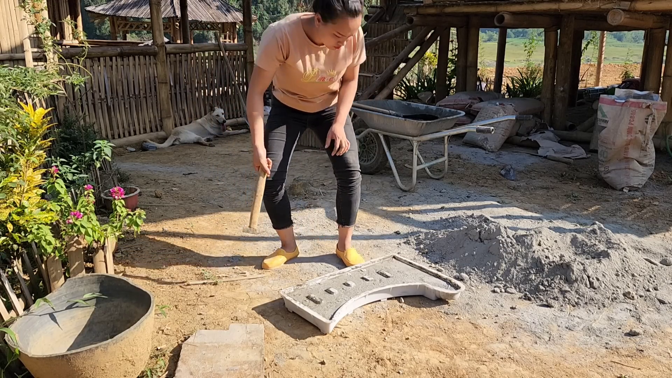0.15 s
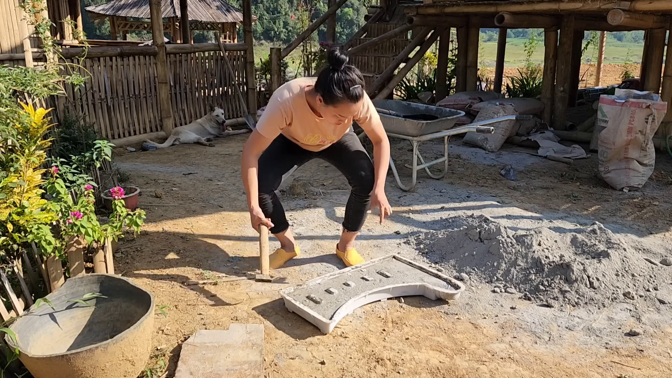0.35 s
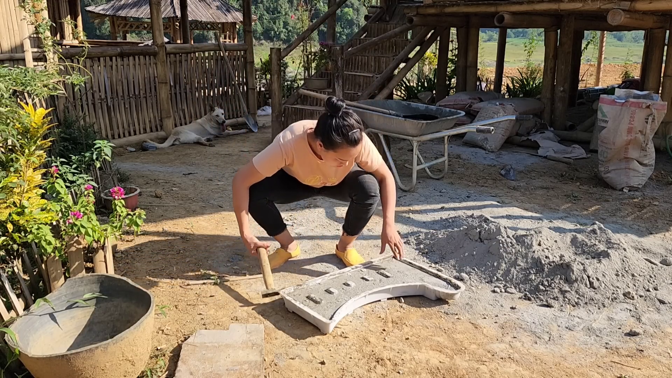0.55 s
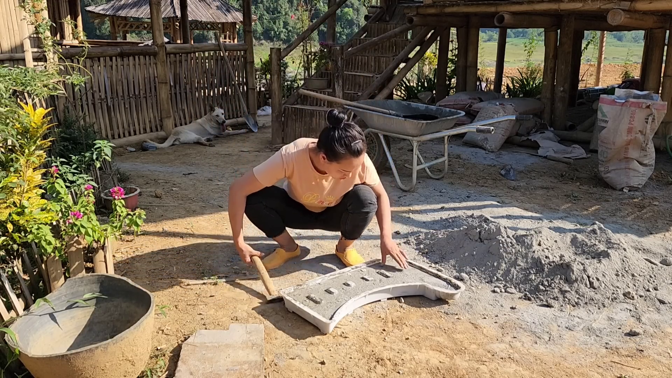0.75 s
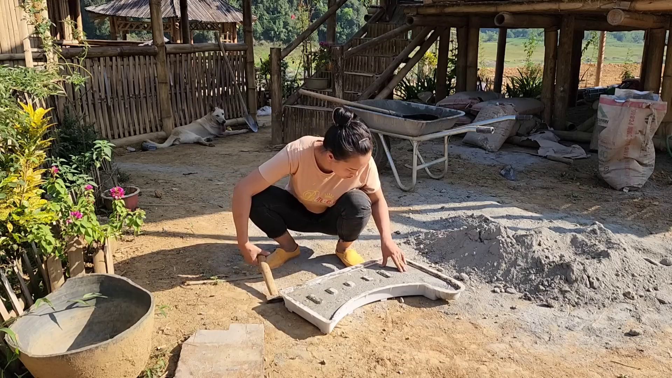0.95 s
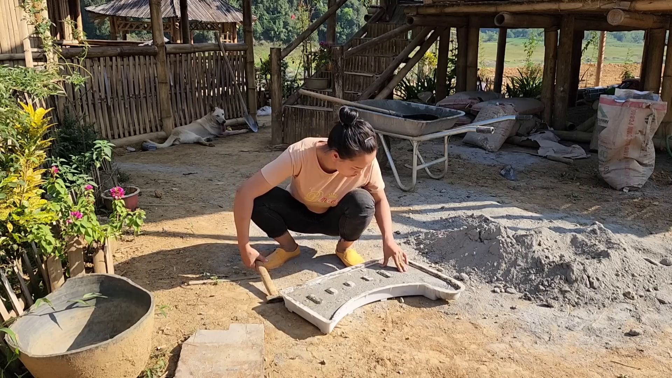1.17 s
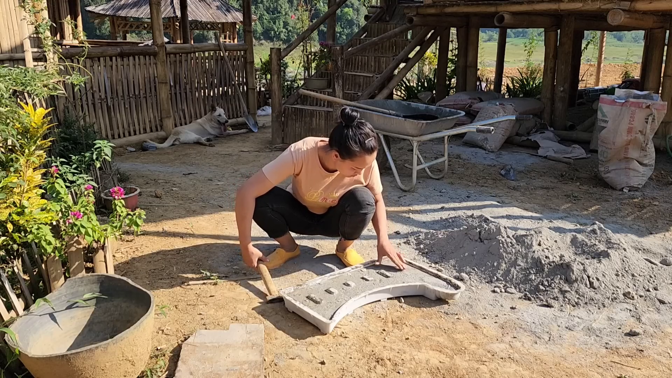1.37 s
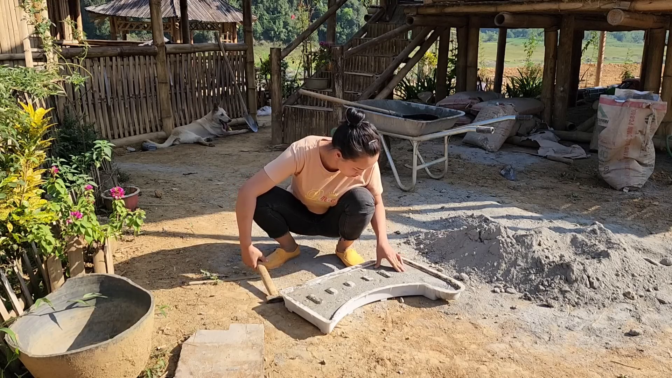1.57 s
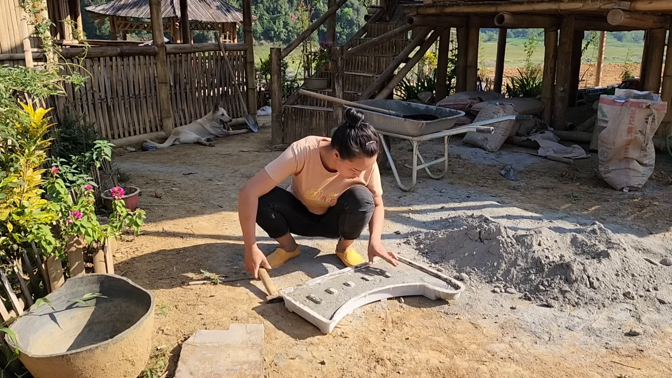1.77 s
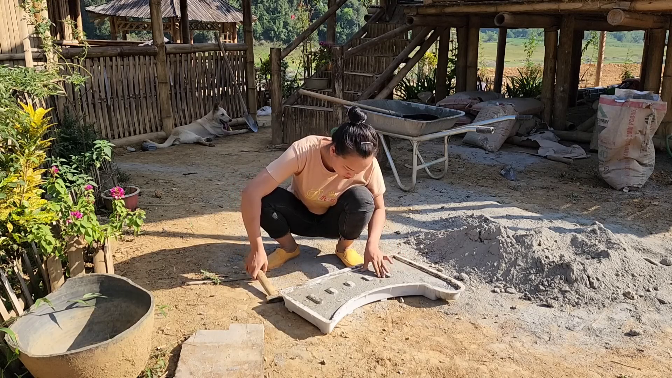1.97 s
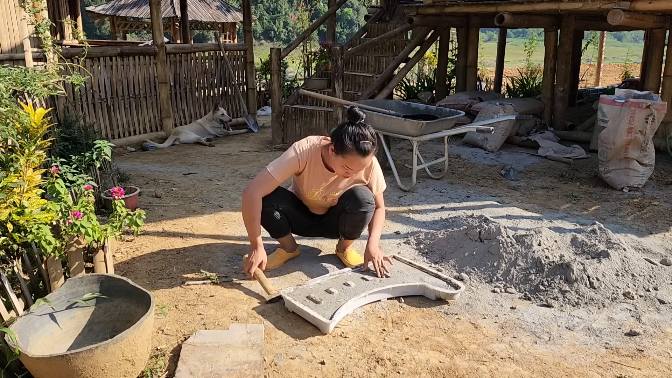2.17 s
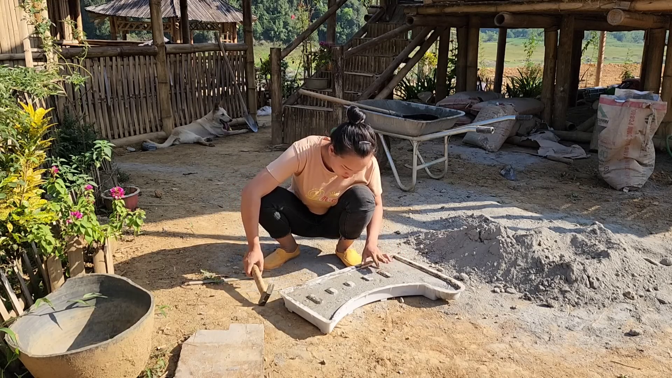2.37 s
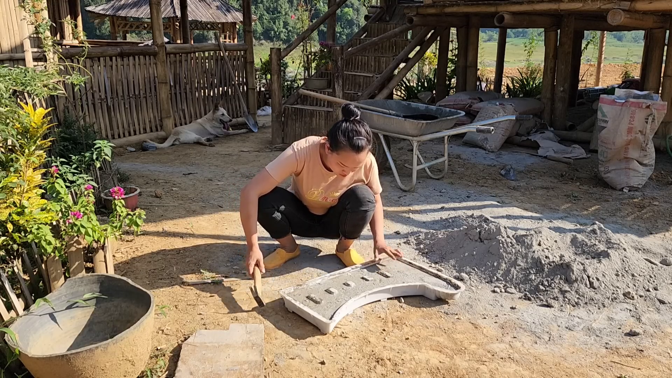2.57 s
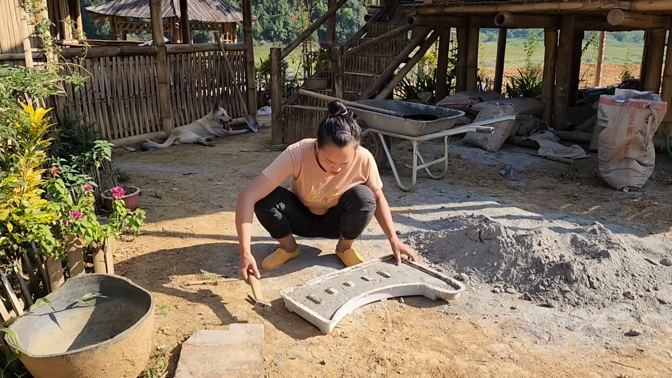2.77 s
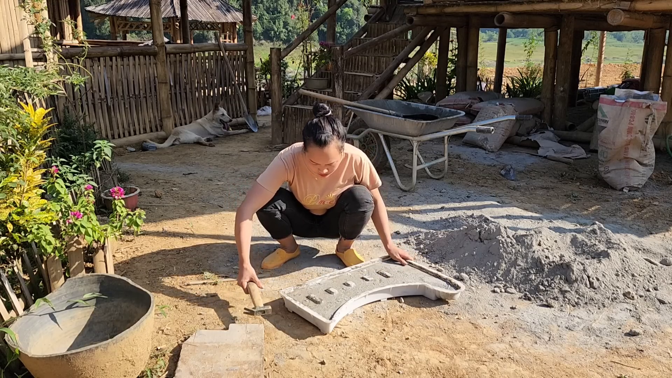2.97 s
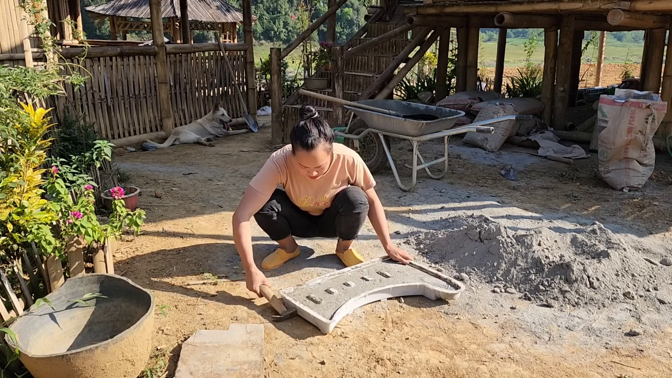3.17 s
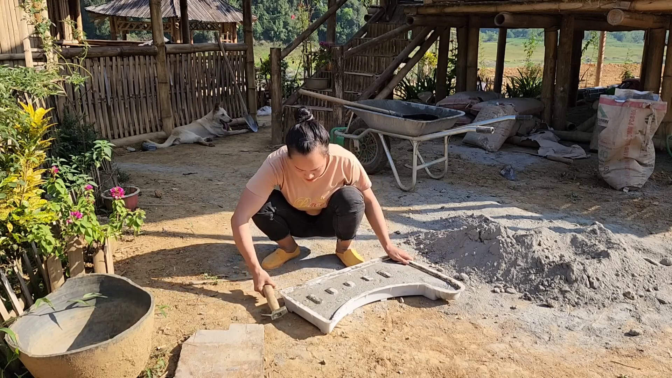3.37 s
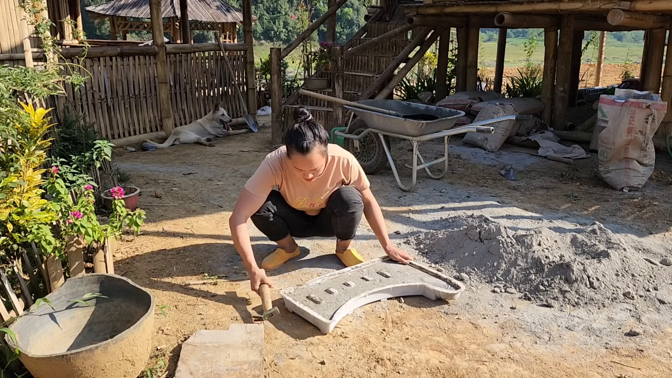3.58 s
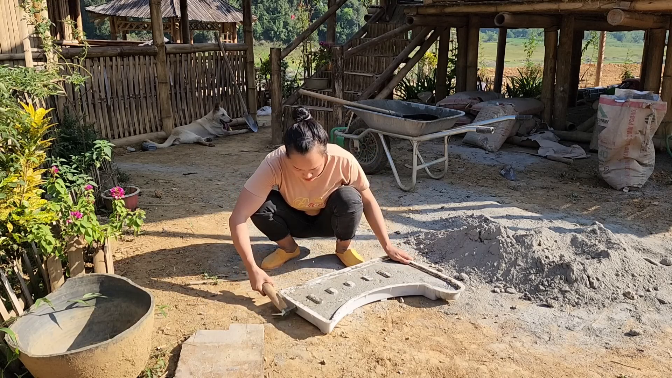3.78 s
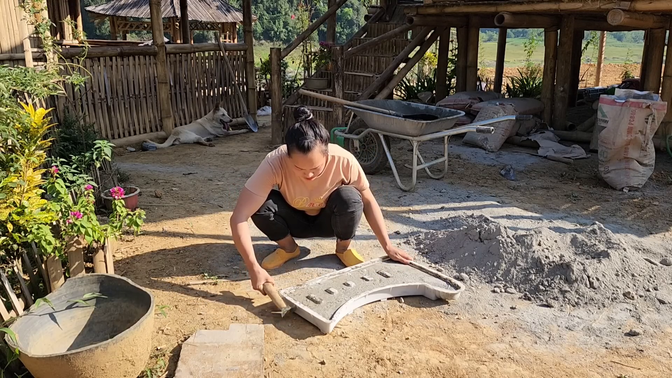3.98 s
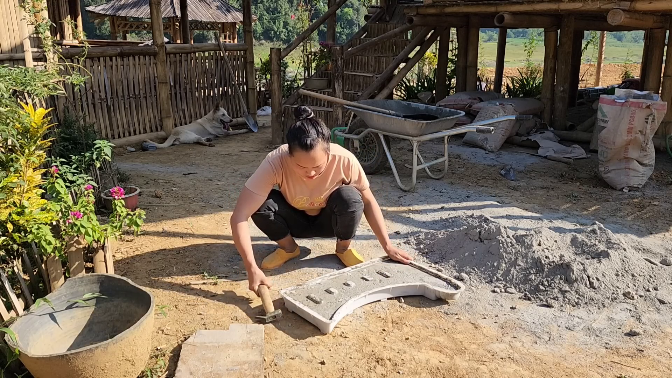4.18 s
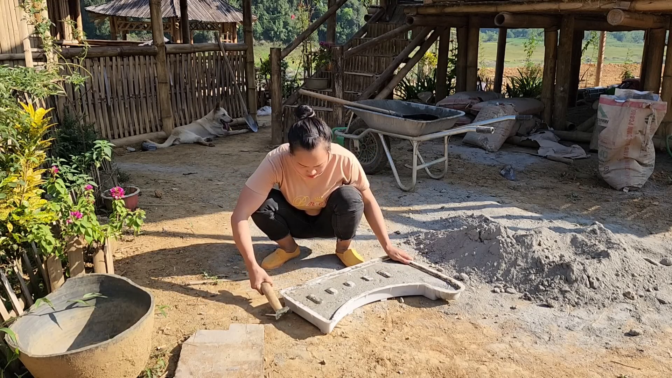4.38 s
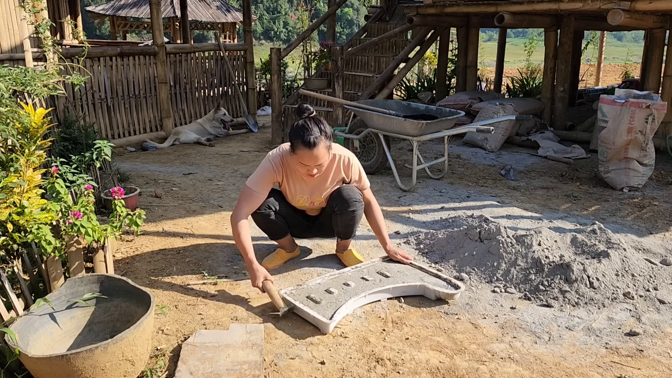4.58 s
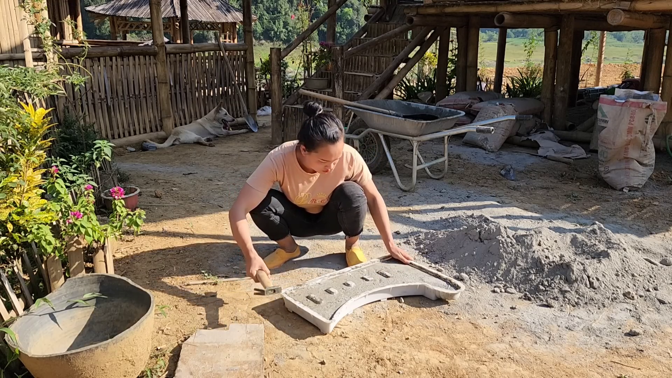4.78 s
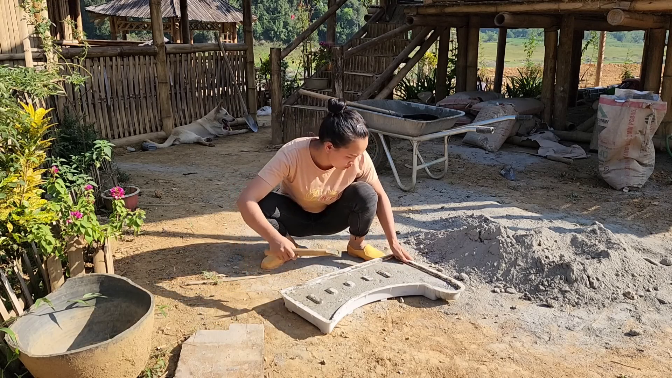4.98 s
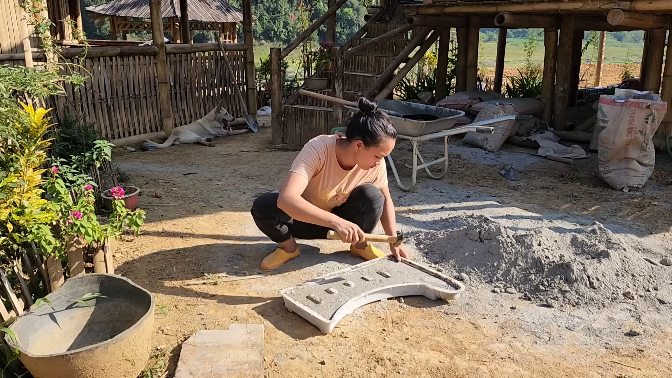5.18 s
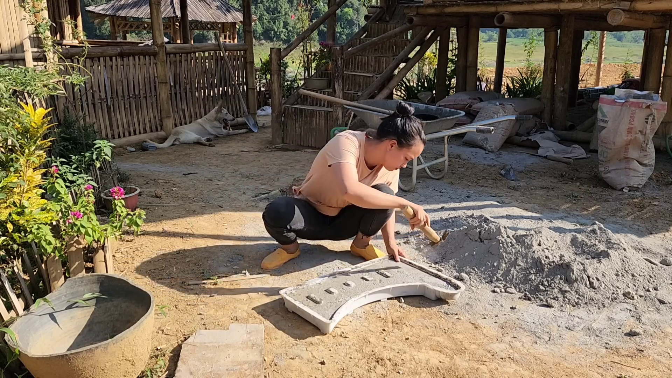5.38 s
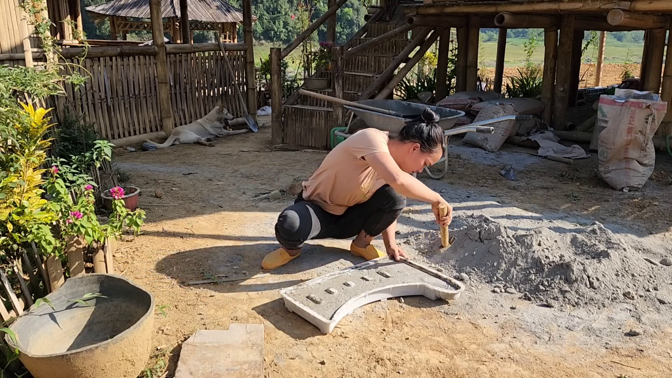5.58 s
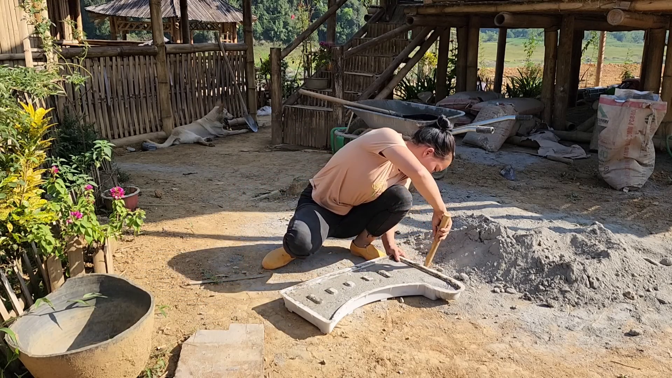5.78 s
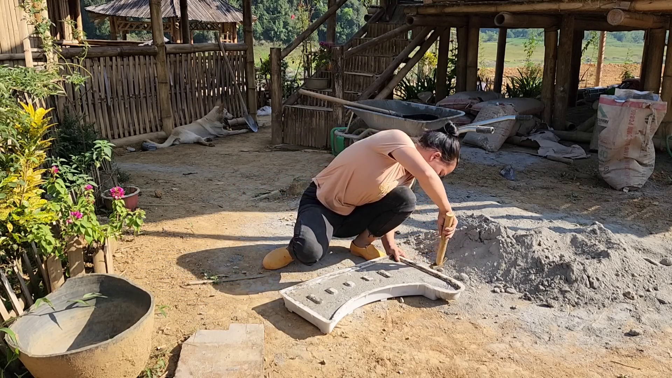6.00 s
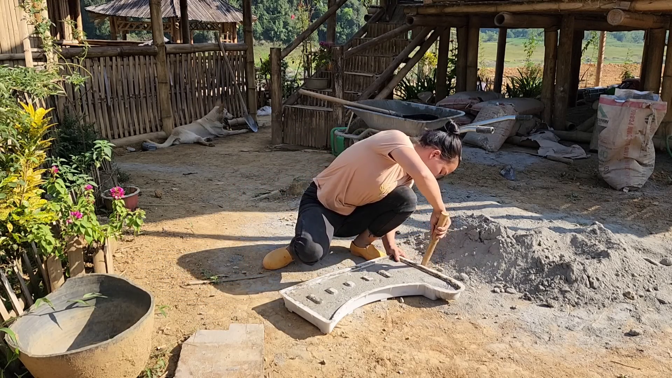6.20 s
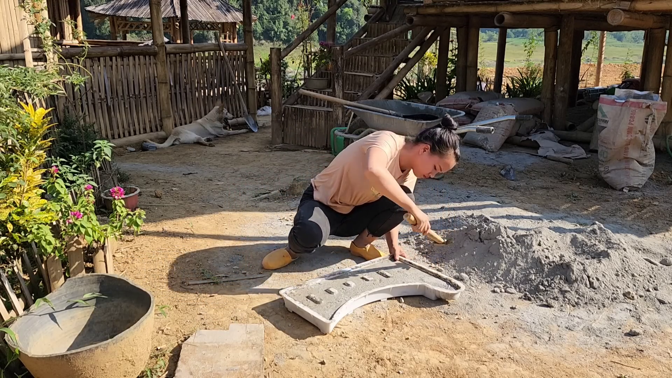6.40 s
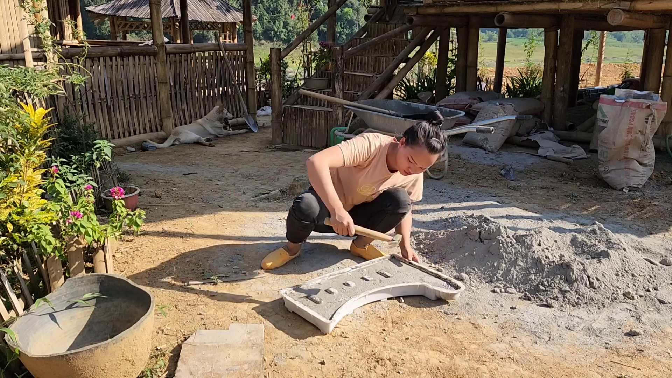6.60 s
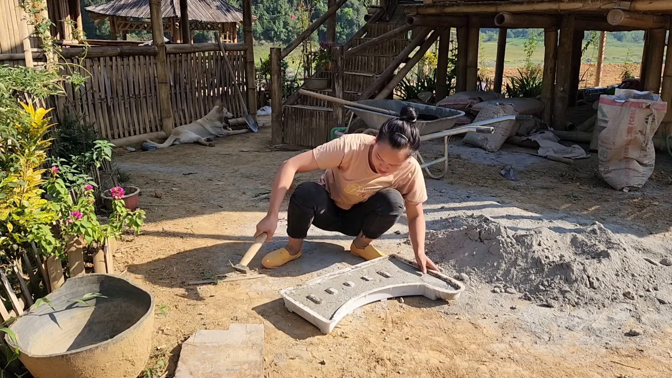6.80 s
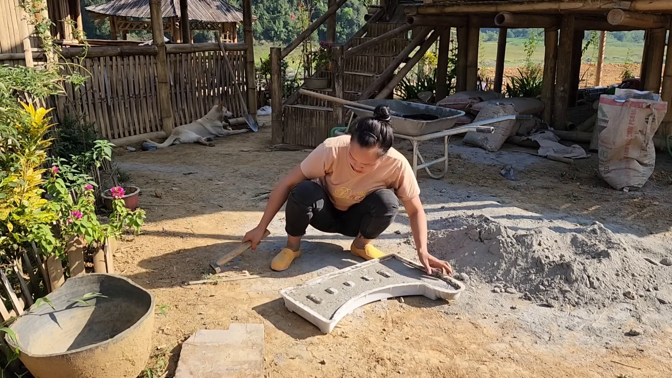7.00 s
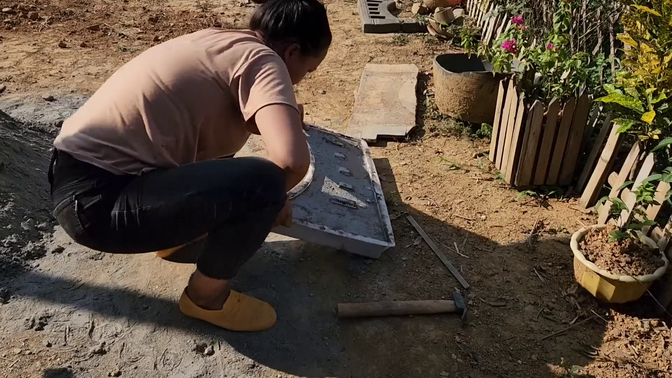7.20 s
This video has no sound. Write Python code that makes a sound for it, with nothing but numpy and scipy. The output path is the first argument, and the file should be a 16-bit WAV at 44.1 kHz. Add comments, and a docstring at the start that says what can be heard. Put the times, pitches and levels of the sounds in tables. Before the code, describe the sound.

Sharp, close mallet blows on a concrete casting mould are the loudest sound, each with a brief ring, a gritty rattle and a slight echo off a shed. They come as an even run of six, then a pair after soft foot scuffs. Before them, a rooster crows once, farther off to the right. Faint songbirds, chicks, insects, low wind and a few distant taps fill the farmyard.

```python
"""A rooster crows off to the right over insect hiss, peeping birds and low wind in a warm farmyard.
The crow is a harmonic voice shaped by the windpipe, rasping where hoarse; birds are gliding sines.
Close by and loudest, a mallet knocks a casting mould, which rings and rocks on grit.
Feet scuff, something is tapped far off under a stilt shed, and the shed throws each knock back."""
import sys
import numpy as np
from scipy import signal
from scipy.fft import rfft, irfft
from scipy.io import wavfile
from scipy.ndimage import uniform_filter1d

SR = 44100
rng = np.random.default_rng(int(sys.argv[2]) if len(sys.argv) > 2 else 0)


def wav_out(sig):
    """Save sig, one row per channel (or a flat mono array), as 16-bit PCM at SR to the path in sys.argv[1]."""
    wavfile.write(sys.argv[1], SR, np.round(np.clip(np.atleast_2d(sig).T, -1, 1) * 32767).astype(np.int16))


N = 319725

# steady background hiss, peaking near 7.6 and 9.1 kHz, very faint above 10 kHz:
# (frequency [Hz], relative level [dB])
HISS_SPECTRUM = [(80, -33), (130, -6), (330, -25), (600, -12), (1500, -15.5), (2300, -16), (6300, -23.5),
                 (7600, -12), (8600, -17.5), (9100, -16), (9600, -26), (10000, -44), (15000, -46.5),
                 (16400, -55.5)]
# stereo image of the hiss: (frequency [Hz], left-right correlation [-])
HISS_CORRELATION = [(60, -0.016), (380, 0.17), (2380, -0.15), (15000, -0.039)]
# wind gusts: (centre [s], half length [s], lift [dB])
WIND_GUSTS = [(5.422, 0.014, 12.5), (6.737, 0.077, 7)]
# songbird notes: (length [s], start [Hz], nominal end [Hz], bend [-]); bend > 1 holds, then drops
DROP_NOTE, HIGH_NOTE, LOW_NOTE = (.036, 4650, 3200, 2.8), (.018, 5750, 4300, 1.1), (.036, 3130, 2400, 1.2)
# first songbird, one dropping note: (time [s], level [dB])
DROP_CALLS = [(.316, -64), (1.222, -67), (1.6, -68), (2.16, -66), (2.622, -66), (2.976, -63.5),
              (3.359, -63.5), (4.238, -72), (5.334, -66.5), (5.697, -67.5), (6.59, -69)]
# second songbird, high-low pairs and lone notes: (time [s])
PAIR_TIMES_S = [.344, 1.034, 1.43, 1.884, 2.311, 3.581, 3.944, 5.299, 5.77, 6.093, 6.422]
LONE_HIGH_S, LONE_LOW_S = [2.2, 3.067, 4.9], [.054, 2.954, 3.286, 4.715]
# chicks: (time [s], length [s], start [Hz], nominal end [Hz], level [dB])
CHICK_PEEPS = [(1.567, 0.1, 7120, 5310, -75), (1.72, .09, 7096, 5440, -77), (1.868, 0.11, 7500, 5350, -74),
               (1.919, 0.067, 5720, 4060, -66), (2.066, 0.14, 6700, 5160, -77),
               (2.19, 0.13, 7150, 5230, -72), (2.413, 0.1, 6430, 3800, -68),
               (2.484, 0.059, 5000, 3500, -75), (2.823, 0.022, 4300, 6200, -64.5),
               (4.716, 0.084, 5090, 4000, -65), (5.241, 0.072, 5660, 3980, -66.5)]
# foot drags: (time [s], level [dB], drag [s], tilt [dB/octave], sole note [Hz])
FOOT_DRAGS = [(.172, -60, 0.02, -2, 570), (1.547, -63.5, 0.041, -3, 470), (2.038, -56, 0.027, -3, 600),
              (2.122, -59.5, 0.02, -6, 550.6), (4.295, -56.5, 0.071, -3.5, 600),
              (4.764, -57, 0.032, -1, 1500), (4.813, -51.5, 0.04, -1.5, 413),
              (4.91, -51, 0.075, -0.5, 1375), (5.068, -58, 0.042, 0.5, 690), (5.609, -69, 0.016, 3.5, 1520),
              (7.1, -69, 0.01, -4.5, 802)]
# crushed grit: (frequency [Hz], relative level [dB])
GRIT_SPECTRUM = [(150, -65), (300, -12), (500, -10), (1350, -3), (3500, -6.5), (7570, -13), (14500, -21),
                 (16000, -47.5)]
# far taps: (time [s], level [dB], dullness [dB/octave])
TAPS = [(2.015, -41.5, 1.5), (2.529, -39, 0), (2.994, -44, 3.5), (4.583, -41.5, 4), (5.084, -40, 8.5),
        (6.957, -36.5, -0.5)]
# tapped object: (frequency [Hz], level [dB], t60 [s])
TAP_MODES = [(645, -40, .03), (954, -6, 0.082), (1390, -3, 0.016), (1770, 2, 0.027), (2087, 7.5, 0.033),
             (2185, 4.5, 0.033), (3700, -6, 0.025), (4300, -18, 0.038)]
# crow, per syllable: (time [s], pitch [Hz], voice [dB], windpipe [Hz], brightness [dB], rasp [dB])
CROW_SYLLABLES = [
    [(.178, 629, -49, 1850, -26, -48), (.21, 626, -50, 1860, -26, -72), (.25, 616, -49, 1870, -28, -66),
     (.275, 658, -50.5, 1410, -36, -54), (.31, 630, -83, 1400, -20, -76)],
    [(.428, 740, -60, 2200, -25, -50.5), (.455, 716, -49, 1970, -22, -51), (.48, 749, -50.5, 1740, 6, -57),
     (.55, 744.4, -47.5, 1750, -1, -67), (.58, 766, -46, 1580, -16, -61), (.64, 771, -44.5, 1430, -13, -82),
     (.69, 764, -43, 1470, -11, -53)],
    [(.69, 767, -48, 1496, -11, -47.5), (.77, 787, -50.5, 1530, -9, -47.5),
     (.9, 743.4, -53, 1830, -0.5, -51), (.97, 727, -56, 1700, 3.5, -51), (1.01, 724, -53.5, 1860, -1, -74)],
    [(1.01, 725, -52, 1800, -6, -70), (1.05, 714.6, -47, 1930, -0.5, -68), (1.1, 711.5, -51, 1810, -3, -76),
     (1.27, 717.6, -50.5, 1680, -6, -75), (1.36, 719, -49.5, 1730, -27, -82),
     (1.45, 723.1, -51, 1650, -6, -73), (1.6, 731.2, -48, 1690, -13, -74), (1.8, 730.4, -50, 1650, -6, -84),
     (2.0, 721, -47.5, 1590, -11.5, -73), (2.06, 708, -43, 1530, -17, -52),
     (2.105, 695.5, -46.5, 1490, -30, -63), (2.135, 672, -54, 1470, -28, -53),
     (2.165, 665, -75, 1500, -24, -83)],
]
# per syllable, relative to the voice: (fundamental [dB], upper harmonics [dB])
CROW_BALANCE = [(-16, -30), (-14.5, -16), (-8, -15), (-18, -24)]
# beak colour on the upper harmonics: (frequency [Hz], gain [dB])
BEAK_RESPONSE = [(3600, 1), (4400, -7), (5100, -3.5), (6500, -2), (8000, -7), (10000, -14.5), (11600, -12),
                 (13000, -24), (16000, -23)]
# mould, concrete and mallet ringing together: (frequency [Hz], level [dB], t60 [s])
MOULD_MODES = [(388, -4, 0.012), (630, -10, 0.034), (885, -5, 0.054), (972, -0.5, 0.027),
               (1423, -1.5, 0.021), (1619, -1, 0.025), (2022, 5, 0.019), (2236, -3, 0.017),
               (2588, -2, 0.004), (2900, 3, 0.0053), (3503, 3, 0.013), (4070, 3.5, 0.0055),
               (4512, 4, 0.014), (5434, -1.5, .01), (6370, -2, 0.0021), (7730, 8.5, 0.011),
               (7600, -1, .009), (11380, -2.5, 0.022), (13800, -14.5, .009)]
# average blow: (frequency [Hz], gain [dB])
BLOW_SPECTRUM = [(400, -22), (900, -17.5), (2000, -9.5), (4000, -16), (9000, -24.5)]
# blows, each landing again after a moment: (time [s], level [dB], low-mode weight [dB], high-mode bite [dB],
# recontact [s])
MALLET_BLOWS = [(.152, -42.5, 14, -2, 0.0019), (.164, -31.5, -8, 15, 0.004), (0.695, -29.5, 12, -1, 0.0041),
                (2.909, -26.5, 7.5, -8, .0023), (3.223, -11.5, -4.5, -14, .003), (3.487, -7, -4, 2, 0.0052),
                (3.539, -33.5, 28, 3, .0021), (3.757, -2.5, -5, 4, 0.0041), (3.801, -24, 25, -10.5, 0.0013),
                (4.07, -6, 8.5, 2, 0.0049), (4.132, -27, 12, -3, .0035), (4.387, -7, 19, 10, .0052),
                (4.639, -7, 5, -2, 0.0035), (5.875, -5, 7, 1.5, .0012), (6.182, -5, 10.5, 9.5, 0.002204),
                (6.305, -41.5, 14.5, 6, 0.0029)]


def gain(db):
    return 10 ** (np.asarray(db) / 20)


def unit_rms(x):
    return x / np.sqrt(np.mean(x ** 2) + 1e-20)


def curve_at(points, hz):
    knots_hz, values = np.transpose(points)
    return np.interp(np.log(hz + 1), np.log(knots_hz + 1), values)


def add(mix, start_s, sound, pan_db=0, lag_samples=0):
    """Mix in a sound; positive pan favours the left, positive lag delays the left."""
    for side, sign in enumerate((1, -1)):
        start = max(round(start_s * SR) + round(lag_samples) * (1 - side), 0)
        part = mix[side, start:start + len(sound)]
        part += gain(sign * pan_db / 2) * sound[:len(part)]


def band(x, lo_hz, hi_hz):
    return unit_rms(signal.sosfilt(signal.butter(2, [lo_hz, hi_hz], "bandpass", fs=SR, output="sos"), x))


def noise(n, lo_hz, hi_hz):
    return band(rng.standard_normal(n), lo_hz, hi_hz)


def flicker(n, depth_db, span_samples):
    return gain(depth_db * unit_rms(uniform_filter1d(rng.standard_normal(n), span_samples)))


def ring(modes, colour_db):
    """Decaying sines; each strike lands elsewhere and shifts the modes."""
    t = np.arange(4000)[:, None] / SR
    hz, db, t60_s = np.transpose(modes)
    db = db + colour_db(hz) + 2.1 * rng.standard_normal(len(hz))
    hz = hz * (1 + .032 * rng.standard_normal(len(hz)))
    return (gain(db - 60 * t / t60_s) * np.sin(2 * np.pi * hz * t)).sum(1)


def background_hiss(level_db=-63.5):
    """Steady hiss, insects near 7.6 and 9.1 kHz: random short-time spectra with drifting patches."""
    hz = np.fft.rfftfreq(512, 1 / SR)
    a, b, c, d, patches = rng.standard_normal((N // 128 + 5, 257, 5)).T
    patches = unit_rms(uniform_filter1d(uniform_filter1d(patches, 6, 0), 16, 1))
    correlation = curve_at(HISS_CORRELATION, hz)[:, None]
    left = a + 1j * b
    right = correlation * left + np.sqrt(1 - correlation ** 2) * (c + 1j * d)
    spectra = np.array([left, right]) * gain(curve_at(HISS_SPECTRUM, hz)[:, None] + 1.4 * patches)
    return gain(level_db) * unit_rms(signal.istft(spectra, nperseg=512, noverlap=384)[1][:, :N])


def breeze(level_db=-65.5):
    """Wind rumble, mostly common to both microphones, with a wavering far hum."""
    common, spread, hum = rng.standard_normal((3, N))
    centre = band(common, 25, 100) + .23 * band(hum, 62, 78)
    left = gain(3.5) * (centre + .18 * band(spread, 23, 90))
    right = centre - .91 * band(spread, 16, 120)
    t = np.arange(N) / SR
    gust_db = sum(db * np.exp(-((t - centre_s) / half_s) ** 4) for centre_s, half_s, db in WIND_GUSTS)
    return gain(level_db + gust_db) * unit_rms(np.array([left, right]))


def shed_echo(x, first_s, hold_s, t60_s, tail_db, tail_t60_s, cutoff_hz):
    """Reflections off posts and fence: steady, then decaying, over a faint long tail."""
    t = np.arange(SR // 2) / SR
    envelope = gain(-60 * np.maximum(t - hold_s, 0) / t60_s) + gain(tail_db - 60 * t / tail_t60_s)
    echoes = rng.choice([-1., 1.], (2, len(t))) * (rng.random((2, len(t))) < .08)
    echoes *= envelope * (t > first_s)
    echoes[1] = .16 * echoes[0] + .99 * echoes[1]
    echoes = signal.lfilter(*signal.butter(1, cutoff_hz, fs=SR), echoes)
    return signal.fftconvolve(x, echoes / np.linalg.norm(echoes[0]), axes=1)[:, :N]


def birds(pair_gap_s=.053, peep_bend=.6):
    """Husky gliding sines; two songbirds sit left, the chicks are scattered."""
    low_times_s = [s + pair_gap_s for s in PAIR_TIMES_S] + LONE_LOW_S
    notes = [(s, *DROP_NOTE, db, 6) for s, db in DROP_CALLS]
    notes += [(s, *HIGH_NOTE, -68.5, 6) for s in PAIR_TIMES_S + LONE_HIGH_S]
    notes += [(s, *LOW_NOTE, -68, 6) for s in low_times_s]
    notes += [(*glide, peep_bend, db, 6 * rng.uniform(-.76, 1)) for *glide, db in CHICK_PEEPS]
    out = np.zeros((2, N))
    for start_s, length_s, start_hz, end_hz, bend, db, pan_db in notes:
        n = round(length_s * SR)
        hz = start_hz + (end_hz - start_hz) * rng.uniform(.85, 1.2) * np.linspace(0, 1, n) ** bend
        envelope = flicker(n, 3.2, 120) * signal.windows.tukey(n, .6)
        note = envelope * np.sin(2 * np.pi * np.cumsum(hz) / SR)
        add(out, start_s, gain(db + 2 * rng.standard_normal()) * note, pan_db)
    return out


def scuffs():
    """Grit crushed under a sole: sudden grip, uneven grains, hollow note, quick release."""
    out, t = np.zeros((2, N)), np.arange(8192) / SR
    hz = np.fft.rfftfreq(len(t), 1 / SR)
    for start_s, db, drag_s, tilt_db, sole_hz in FOOT_DRAGS:
        grit = gain(curve_at(GRIT_SPECTRUM, hz) + tilt_db * np.log2((hz + 100) / 1000))
        sole = 1 + 3 / (1 + ((hz - sole_hz) / 70) ** 2)
        grip = np.minimum(t / .00048, 1) * gain(-450 * np.maximum(t - drag_s, 0))
        for pan_db in (-5, 5):
            grains = rng.standard_normal(len(t)) * flicker(len(t), 2.15, 140)
            scuff = grip * unit_rms(irfft(rfft(grains) * grit * sole))
            add(out, start_s, gain(db) * scuff, pan_db, lag_samples=pan_db / 2)
    return out


def far_taps(rattle_per_s=300):
    """A small object, struck far off, rings and rattles briefly."""
    out, t = np.zeros((2, N)), np.arange(2500) / SR
    for start_s, db, dull_db in TAPS:
        contacts = .5 * rng.standard_normal(len(t)) * (rng.random(len(t)) < rattle_per_s / SR)
        contacts *= np.exp(-t / .019)
        contacts[0] = 1
        tap = signal.fftconvolve(contacts, ring(TAP_MODES, lambda hz: dull_db * np.log2(2200 / hz)))
        add(out, start_s, gain(db) * tap / abs(tap).max(), pan_db=-.7, lag_samples=-21.5)
    return out


def rooster(pipe_width_hz=445, throb_db=5):
    """The windpipe picks harmonic 2 or 3; hoarse parts flutter and carry a throbbing rasp."""
    out = np.zeros((2, N))
    for rows, (fundamental_db, upper_db) in zip(CROW_SYLLABLES, CROW_BALANCE):
        times_s, *columns = np.transpose(rows)
        t = np.arange(times_s[0], times_s[-1], 1 / SR)
        n = len(t)
        hz, voice_db, pipe_hz, bright_db, rasp_db = (np.interp(t, times_s, c) for c in columns)
        hoarse = np.clip((rasp_db + 50) / 18, 0, 1)
        phase = 2 * np.pi * np.cumsum(hz) / SR + .036 * (hoarse + .033) * noise(n, 30, 230)
        pipe_db = [-21 * np.log10(1 + ((k * hz - pipe_hz) / pipe_width_hz) ** 4) for k in (2, 3)]
        beak_db = [upper_db + .4 * bright_db + curve_at(BEAK_RESPONSE, k * hz) + 2.85 * noise(n, 1, 13)
                   for k in range(5, 21)]  # weak overtones come and go
        voice = sum(gain(voice_db + db) * np.sqrt(2) * np.sin(k * phase + k * k)
                    for k, db in enumerate([fundamental_db, *pipe_db, bright_db, *beak_db], 1))
        throb = gain(throb_db * noise(n, 27, 200))
        rasp = band(noise(n, 1260, 2140), 1460, 2180) + gain(-13.5) * noise(n, 5150, 7400)
        fade = np.clip(np.minimum(t - times_s[0], times_s[-1] - t) / .0028, 0, 1)
        syllable = fade * (voice + gain(rasp_db) * unit_rms(throb * rasp))
        add(out, times_s[0], syllable, pan_db=-.6, lag_samples=20)
    return out


def mould_rocking():
    """The struck mould rocks on grit and the ground thuds."""
    t = np.arange(5000) / SR
    swell = (t / .013) ** 2 * np.exp(-2 * t / .015)
    a, b, c = rng.standard_normal((3, len(t)))
    rattle = band(a, 470, 1600) + gain(-4.5) * band(b, 2900, 3900) + gain(-8.5) * band(c, 4500, 12000)
    thud = gain(-6) * band(c, 76, 230) * t / .025
    return swell * (rattle + thud)


def mallet(move_s=5.2, bite_hz=3260):
    """Each blow lands, chatters and lands again, ringing the mould. Returns (knocks, rocking)."""
    knocks, rocking, t = np.zeros((2, N)), np.zeros((2, N)), np.arange(600) / SR
    for start_s, db, weight_db, bite_db, recontact_s in MALLET_BLOWS:
        lag_samples = -3 if start_s < move_s else 2  # mould's left end, then its right
        contact = .41 * rng.standard_normal(len(t)) * np.exp(-t / .0027)
        contact[0] -= 1
        contact[int(recontact_s * SR)] -= .9
        tilt = [(1000, weight_db), (2000, 0), (bite_hz, bite_db), (2 * bite_hz, .64 * bite_db)]
        mould = ring(MOULD_MODES, lambda hz: curve_at(BLOW_SPECTRUM, hz) + curve_at(tilt, hz))
        knock = band(signal.fftconvolve(contact, mould), 450, 12000)
        add(knocks, start_s + .0015, gain(db) * knock / abs(knock).max(), .3, lag_samples)
        for pan_db in (-9, 9):  # grit cracks between mallet and mould
            crack = noise(len(t), 2400, 7500) * np.exp(-t / .0049)
            add(knocks, start_s + .0014, gain(db - 26.5 + .1 * bite_db) * crack, pan_db)
        add(rocking, start_s, gain(db - 17) * mould_rocking(), .8, lag_samples)
    return knocks, rocking


def scene():
    """Sources and their shed echoes over hiss and wind."""
    crow, (knocks, rocking), taps = rooster(), mallet(), far_taps()
    calls = crow + birds()
    mould_echo = shed_echo(rocking + .36 * knocks, first_s=.016, hold_s=.02, t60_s=.1,
                           tail_db=-24.5, tail_t60_s=.98, cutoff_hz=8000)
    tap_echo = shed_echo(taps, first_s=.0063, hold_s=.029, t60_s=.16,
                         tail_db=-18, tail_t60_s=.8, cutoff_hz=6800)
    call_echo = shed_echo(calls, first_s=.0014, hold_s=.045, t60_s=.1,
                          tail_db=-24.5, tail_t60_s=1, cutoff_hz=6000)
    echoes = gain(-14.5) * mould_echo + gain(4) * tap_echo + gain(-9) * call_echo
    return knocks + rocking + 1.5 * taps + calls + echoes + scuffs() + background_hiss() + breeze()


def record(dry, end_s=7.143, cutoff_hz=16500):
    """Short fade to silence, then low-pass."""
    fade = np.clip((end_s - np.arange(N) / SR) / .0016, 0, 1)
    lowpass = signal.firwin(511, cutoff_hz, window=("kaiser", 9), fs=SR)
    return signal.oaconvolve(dry * fade, lowpass[None], "same")


dry = scene()
out = record(dry)
wav_out(out)
```